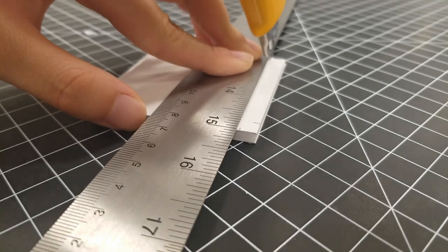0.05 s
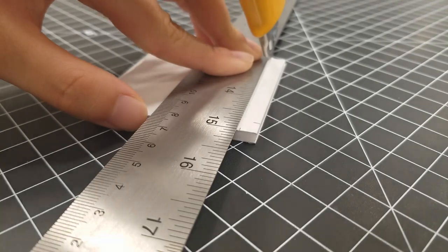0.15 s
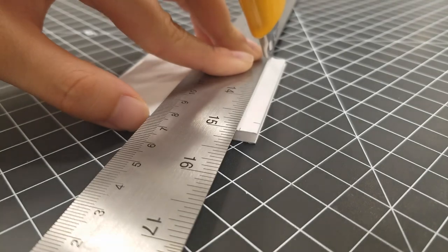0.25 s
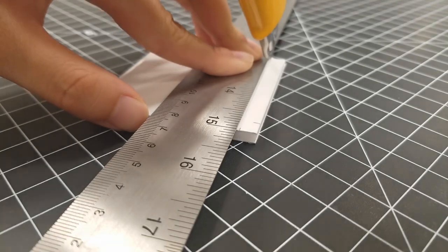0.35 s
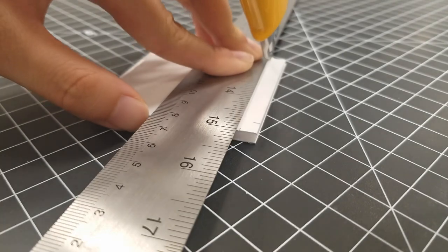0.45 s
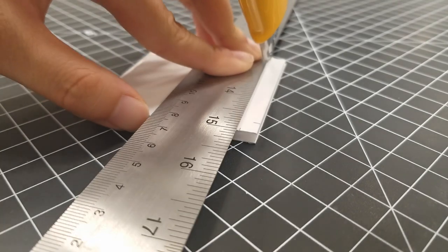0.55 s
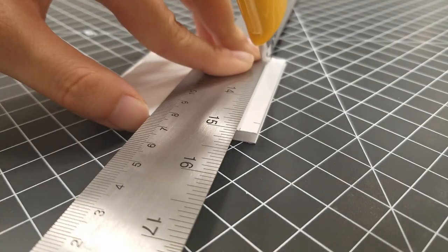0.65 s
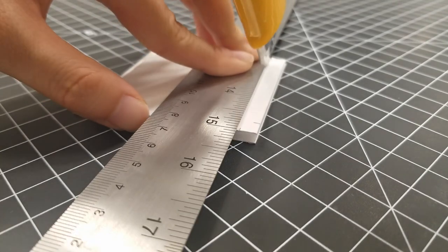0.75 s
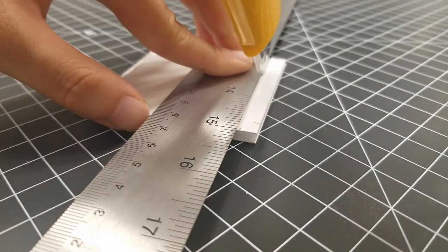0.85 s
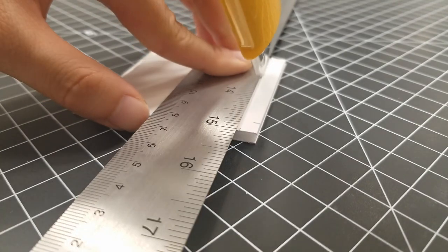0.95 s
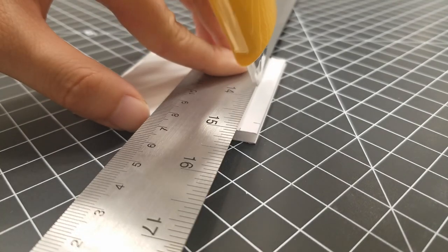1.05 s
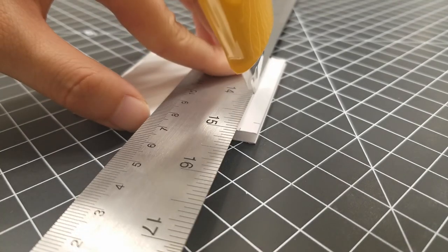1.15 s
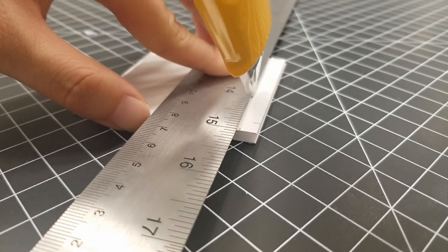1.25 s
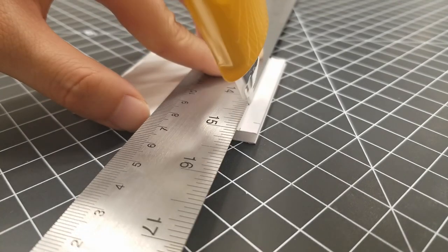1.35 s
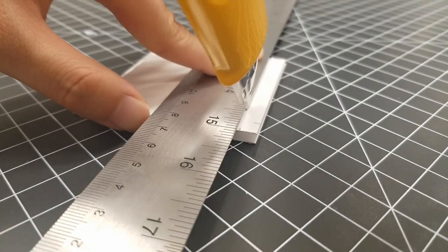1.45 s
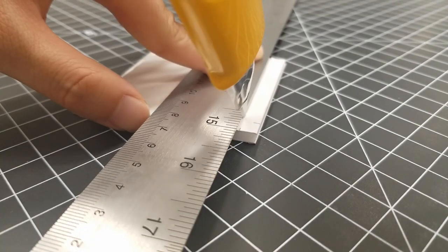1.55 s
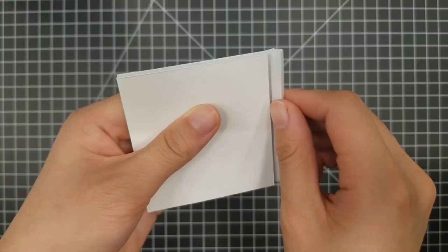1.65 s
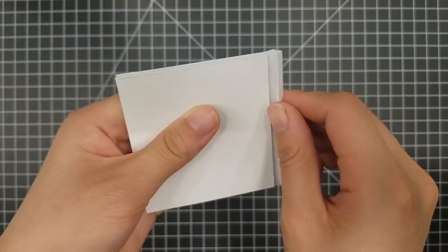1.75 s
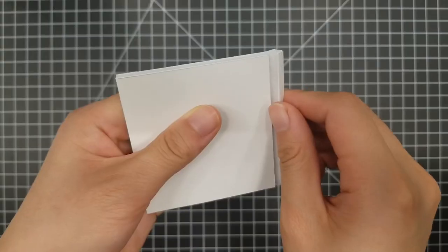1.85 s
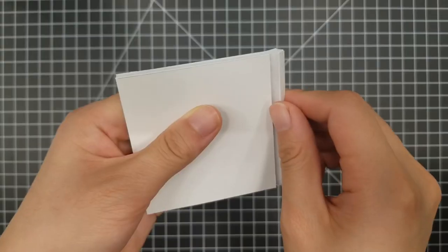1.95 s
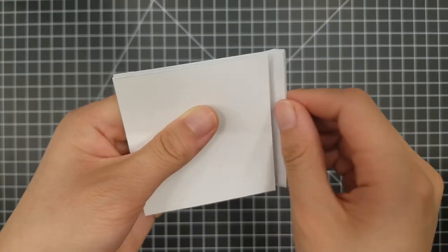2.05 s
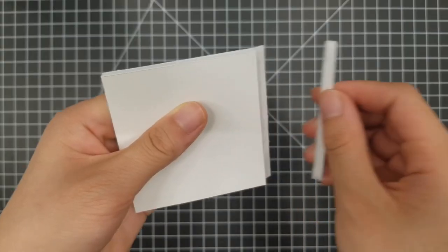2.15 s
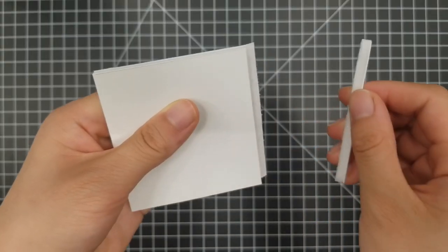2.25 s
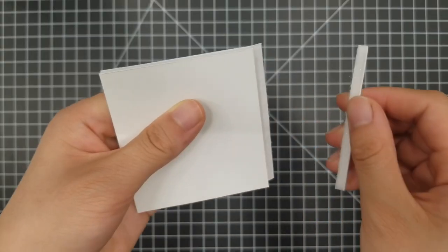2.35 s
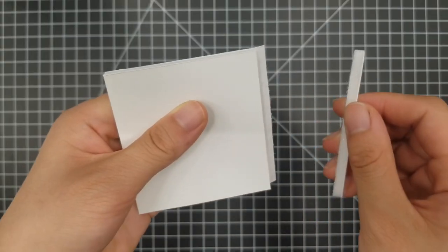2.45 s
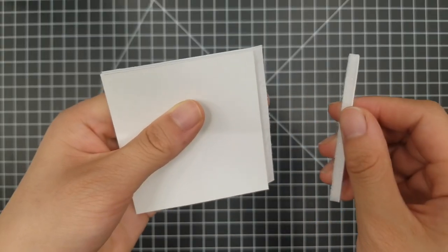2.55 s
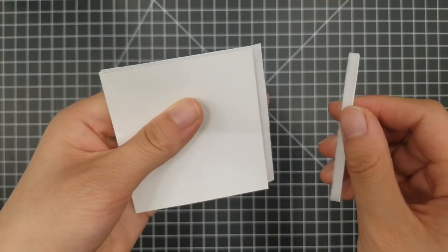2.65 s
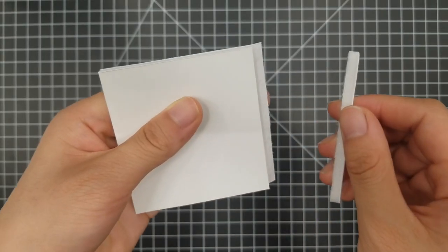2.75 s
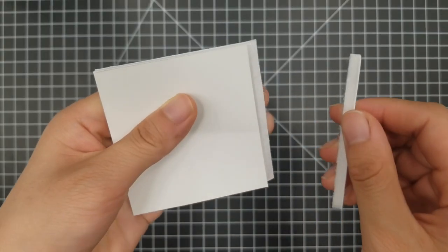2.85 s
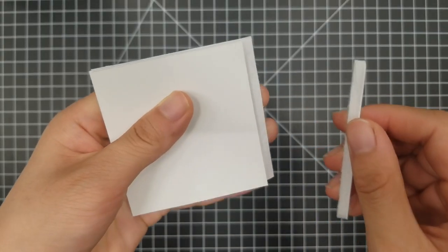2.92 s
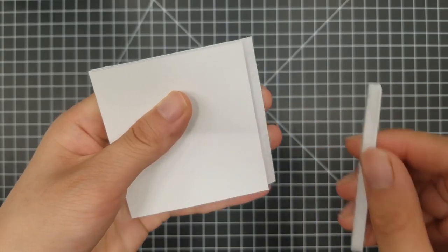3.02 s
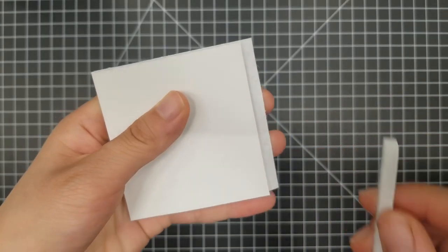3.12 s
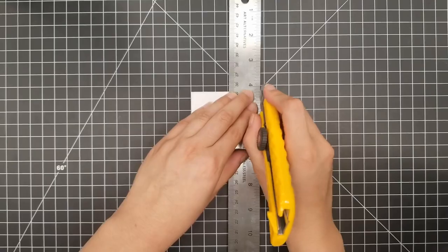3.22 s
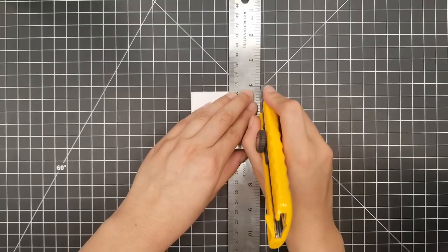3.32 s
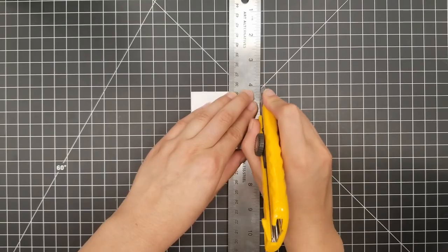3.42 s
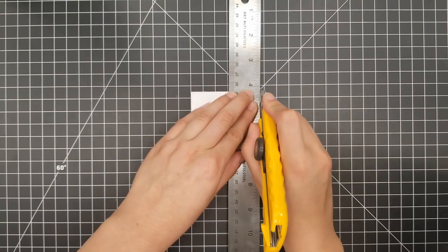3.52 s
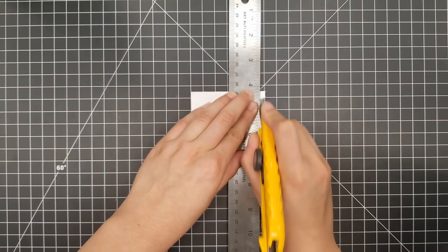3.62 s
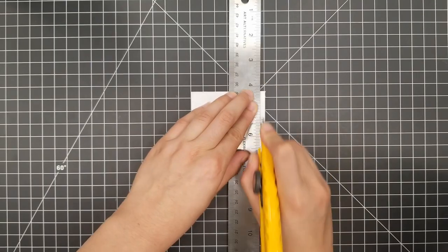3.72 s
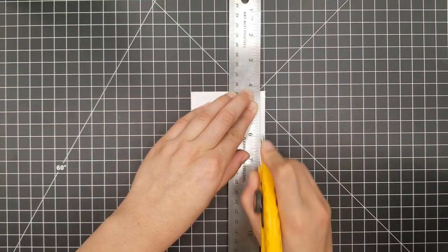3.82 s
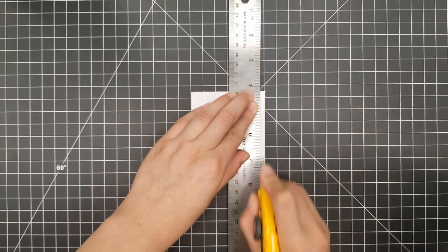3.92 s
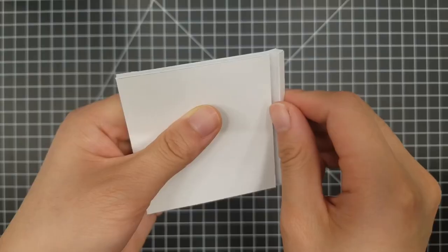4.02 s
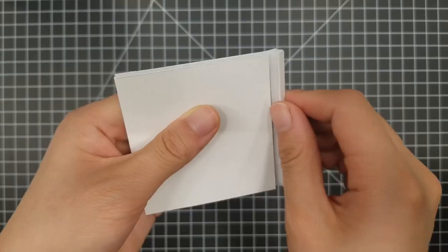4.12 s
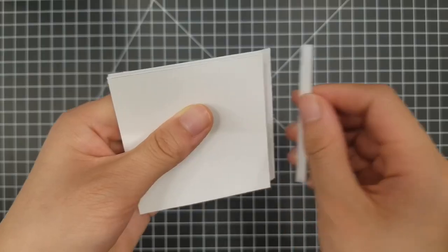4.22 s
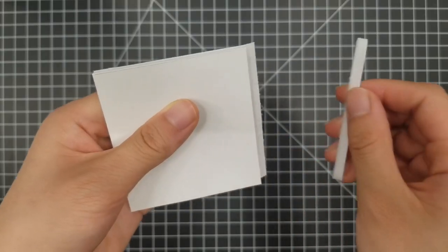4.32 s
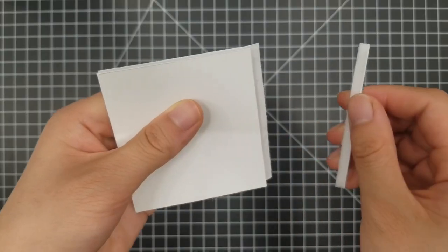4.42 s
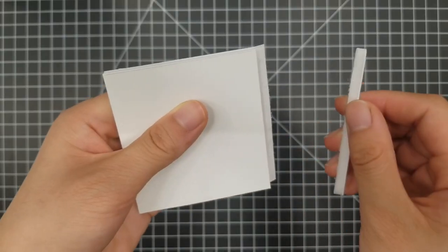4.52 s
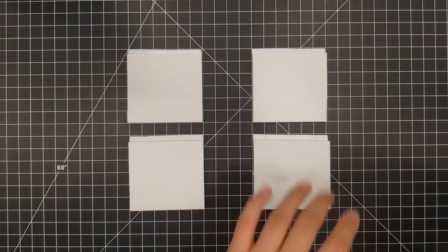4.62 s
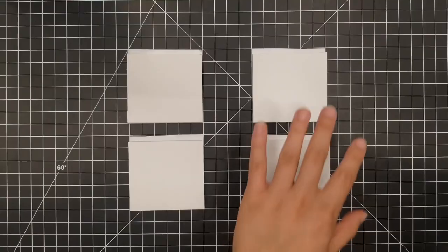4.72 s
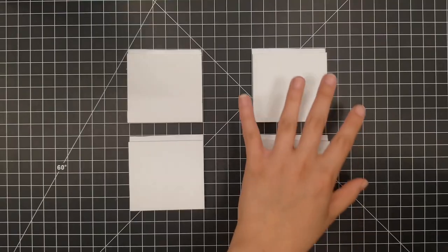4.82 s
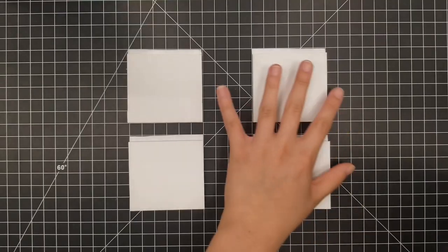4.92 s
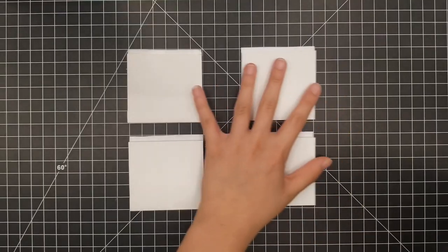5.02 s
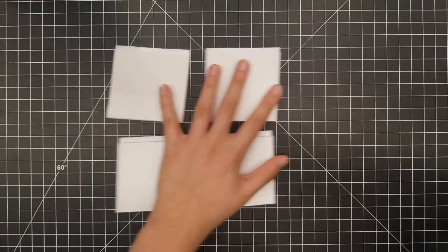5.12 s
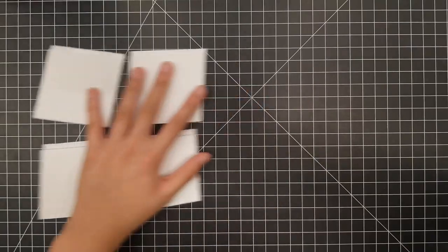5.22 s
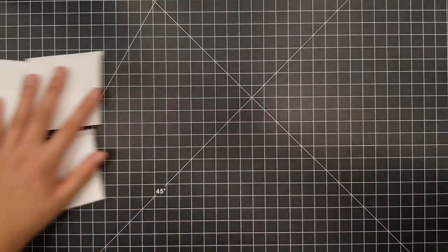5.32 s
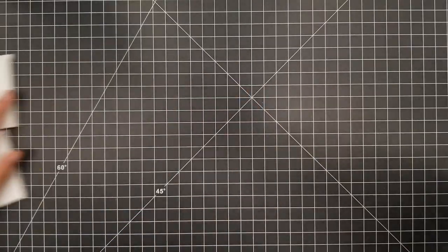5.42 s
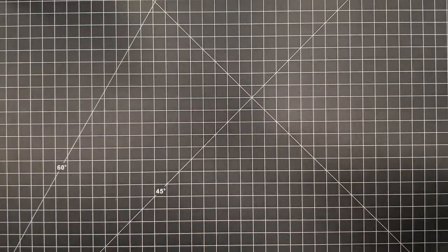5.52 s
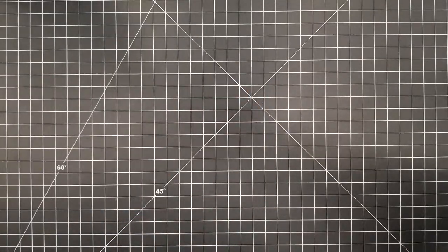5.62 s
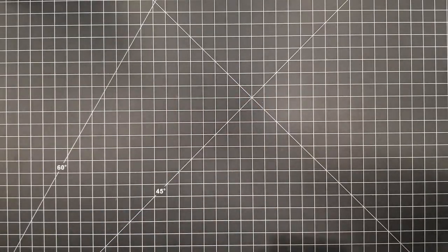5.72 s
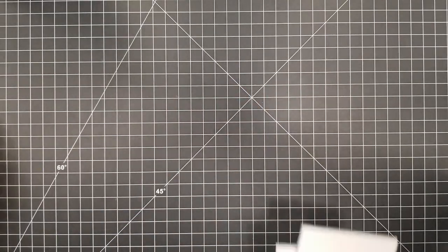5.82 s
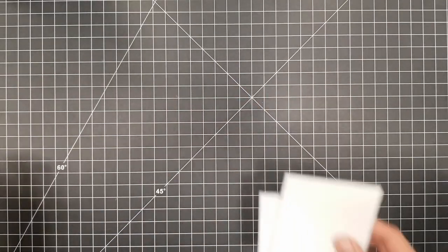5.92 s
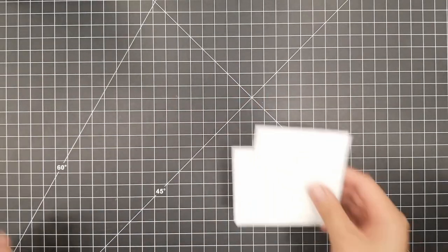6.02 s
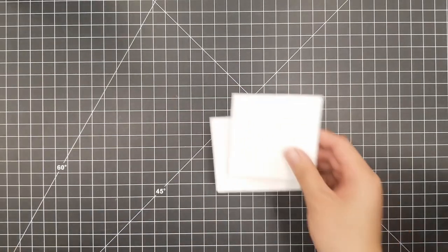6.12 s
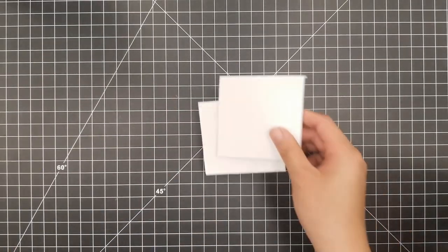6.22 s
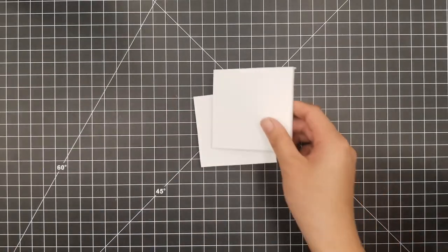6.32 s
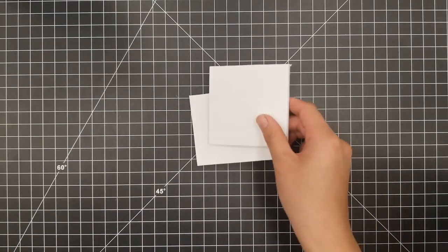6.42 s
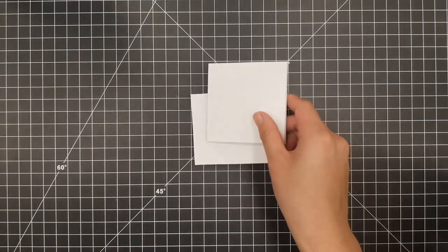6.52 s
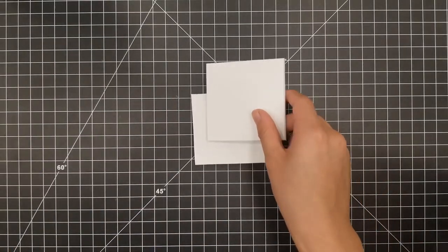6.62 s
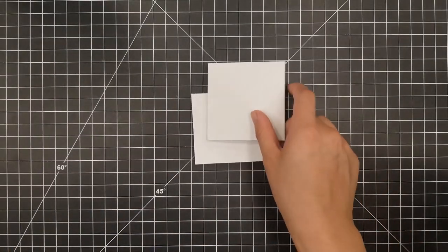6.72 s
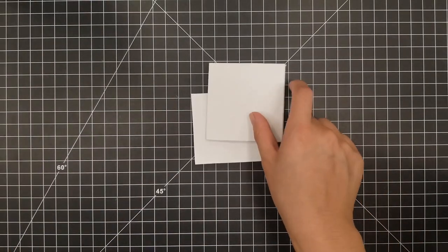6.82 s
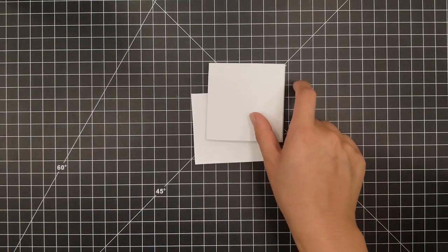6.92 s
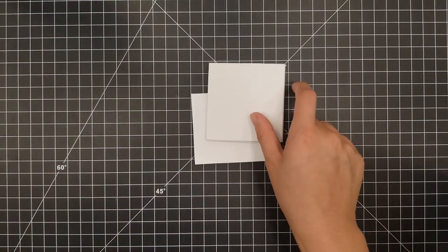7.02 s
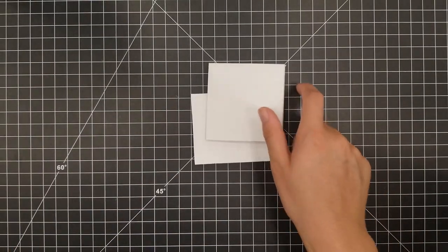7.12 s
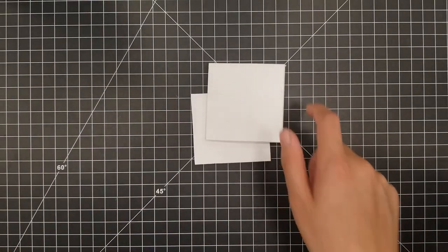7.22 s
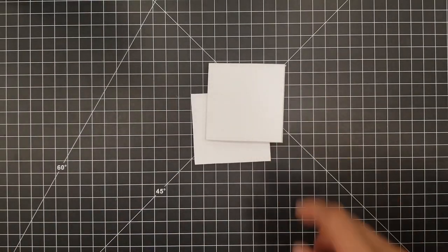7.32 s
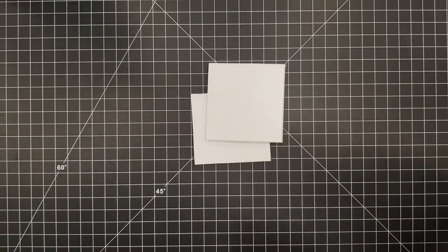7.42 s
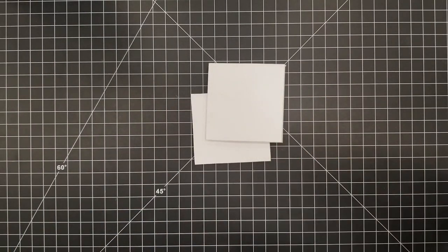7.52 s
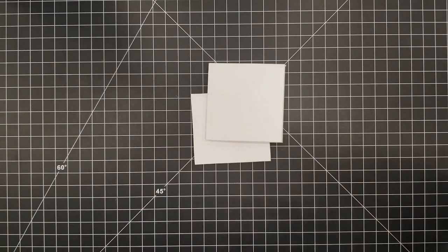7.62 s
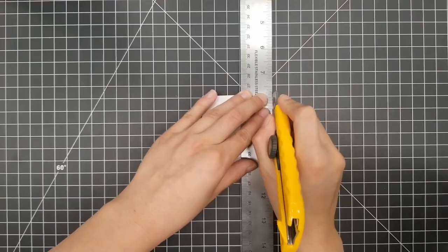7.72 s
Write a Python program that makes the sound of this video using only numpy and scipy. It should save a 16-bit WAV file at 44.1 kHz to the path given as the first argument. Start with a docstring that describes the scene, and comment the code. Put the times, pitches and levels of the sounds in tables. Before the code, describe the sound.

Close to the microphone, a craft knife crunches through foam board in short, gritty pushes with thin squeals and clicks, ending in a sharp crack and a table thud. A strip snaps off. A second, more distant cut and another snap follow. Then the squares hiss across a cutting mat, knock together and are laid down with a light tap. The small room hums quietly.

```python
"""At a table in a quiet, humming room, a craft knife cuts foam board along a steel ruler on a cutting mat. The
cut strip is snapped off, and the very same snap sounds again. Then the squares are swept across the mat and
knock together, and two are laid down again. Bursting foam cells and rubbing paper make dense tiny clicks, the
blade squeals as it sticks and slips, and the table thuds. A phone close by hears it with two microphones."""
import sys
import numpy as np
from scipy import signal
from scipy.fft import rfft, irfft
from scipy.io import wavfile
from scipy.ndimage import map_coordinates

SR = 44100
rng = np.random.default_rng(int(sys.argv[2]) if len(sys.argv) > 2 else 0)


def wrap_up_sound(samples):
    """Save the sound to the file named by the first command line argument, as 16-bit audio."""
    columns = np.atleast_2d(samples).T
    # keep every value between -1 and 1, then stretch to whole-number steps
    tamed = np.clip(columns, -1, 1)
    steps = np.round(tamed * 32767).astype(np.int16)
    wavfile.write(sys.argv[1], SR, steps)


N = 342216
TIME = np.arange(N) / SR
TOP_HZ = 15850  # the phone cuts off higher sound
CLOSE_CUT_END_S = 1.69

# tone of tearing paper, and of sliding on the mat: f/Hz, level/dB
TEAR_TONE = [(950, -25), (1350, -14), (1750, -20), (3200, -11), (3900, -20), (5200, -12), (10500, -6),
             (11900, 6), (15500, 1)]
MAT_TONE = [(1050, -27.5), (1650, -6), (2500, -1), (7500, 2), (15500, -.5)]
# resonances of the board (pitches it rings at; a negative gain is a dip): f/Hz, width/Hz, gain/dB
BOARD_RINGS = [(1640, 260, 7), (2870, 330, 9), (3960, 1900, -6)]
# how much louder the left side is, for sounds by the phone and farther along the desk: f/Hz, lead/dB
NEAR_SIDE = [(150, -12), (400, 8), (1300, 7.5), (2600, 26), (10000, 10.5)]
DESK_SIDE = [(700, 8.5), (4000, 11), (9000, 7.5)]


def amp(db):
    """Turn decibels into a gain."""
    return 10 ** (np.asarray(db) / 20)


def shape(tone, f):
    """Read a table of (f/Hz, level/dB) at frequencies f."""
    hz, db = np.transpose(tone)
    return np.interp(np.log(f + 1), np.log(hz), db)


def bumps(rings, f):
    """Gain in dB of bell-shaped resonances at frequencies f."""
    return sum(db / (1 + (2 * (f - hz) / width) ** 2) for hz, width, db in rings)


def freqs(x):
    """Frequencies in the spectrum of x."""
    return np.fft.rfftfreq(x.shape[-1], 1 / SR)


def colour(x, db):
    """Filter x with a dB value for each frequency."""
    return irfft(rfft(x) * amp(db), x.shape[-1])


def to_mics(x, side, lag_s=0):
    """Share a sound between two microphones: the left faces the hands, the right hears it lag_s later."""
    f = freqs(x)
    lead_db = shape(side, f)
    delay = np.exp(-2j * np.pi * f * lag_s * np.array([[0], [1]]))
    balance_db = 10 * np.log10((1 + amp(2 * lead_db)) / 4)
    return irfft(rfft(x) * delay * amp(np.array([lead_db, 0 * lead_db]) - balance_db), N)


def noise_pair(n, alike):
    """Left and right noise, from unrelated (alike=0) to the same (alike=1)."""
    noise = rng.standard_normal((3, n))
    return np.sqrt(alike) * noise[0] + np.sqrt(1 - alike) * noise[1:]


def wobble(t, per_s):
    """A random line that turns per_s times a second."""
    turns = np.arange(0, N / SR + 1, 1 / per_s)
    return np.interp(t, turns, rng.standard_normal(len(turns)))


def add(out, s, x):
    """Mix x in at s seconds."""
    i = max(int(s * SR), 0)
    out[:, i:i + x.shape[1]] += x[:, :max(N - i, 0)]


def stroke(s, hold, db, rise, fall):
    """Force of one hand movement: it builds up to time s, holds, then lets go."""
    return amp(db) * np.interp(TIME, [s - rise, s, s + hold, s + hold + fall], [0, 1, 1, 0]) ** 2


def strokes(rows, **edges):
    """Force of several movements together, which may share a rise and a fall in seconds."""
    return np.sqrt(sum(stroke(*row, **edges) ** 2 for row in rows))


def friction(force, tone, rings=(), glide=((0, 1),), rough=1.2, patchy_db=1.9, wander=.008,
             change_per_s=8, scatter=.7):
    """Rubbing: countless tiny, uneven slips ring resonances that shift as the contact moves."""
    first_s, last_s = np.flatnonzero(force)[[0, -1]] // SR
    t = TIME[first_s * SR:(last_s + 1) * SR]
    slips = noise_pair(len(t), .5)
    slips *= amp(rough * (2 * wobble(t, 5000) + wobble(t, 400) + .5 * wobble(t, 90)))
    f, elapsed, spectrum = signal.stft(slips / slips.std(), SR, nperseg=640)
    when = elapsed + t[0]
    f, elapsed = np.meshgrid(f, elapsed, indexing="ij")
    # many weak resonances come and go, each reaching the two microphones with its own phase
    spot = [f / 240, elapsed * change_per_s]
    patches, phase = (map_coordinates(m, spot, mode="nearest") for m in rng.standard_normal((2, 96, 128)))
    spectrum = spectrum * np.exp(1j * scatter * np.array([phase, -phase]))
    gain_db = shape(tone, f) + patchy_db * patches
    pitch_ratio = np.interp(when, *np.transpose(glide))
    for ring in rings:
        gain_db += bumps([ring], f / pitch_ratio / np.exp(wander * wobble(when, 11)))
    gain = amp(gain_db)
    gain /= np.sqrt(np.mean(gain ** 2 * (f < TOP_HZ), axis=0))  # the force sets the loudness
    out = np.zeros((2, N))
    add(out, t[0], signal.istft(spectrum * gain, SR)[1][:, :len(t)])
    return out * force


def burst(db, ring_s, tone):
    """A crack of noise that dies by 60 dB in ring_s; tone(f) gives its dB at each frequency."""
    t = np.arange(4096) / SR
    x = noise_pair(len(t), .21) * amp(-60 * t / ring_s) * (1 - np.exp(-t / .0006))
    fade = np.minimum(2 * (1 - t / t[-1]), 1) ** 2
    x = colour(x, tone(freqs(x))) * fade
    return x * amp(db) / np.sqrt(np.mean(np.max(x ** 2, axis=1)))


def strikes(rows, rings, slope_db):
    """Blows ring an object; each is slope_db weaker per octave away from its own frequency."""
    out = np.zeros((2, N))
    for s, db, hz, ring_s in rows:
        add(out, s, burst(db, ring_s, lambda f: bumps(rings, f) - slope_db * abs(np.log2((f + 1) / hz))))
    return out


def close_cut():
    """By the phone the blade bursts foam cells push by push, then breaks out of the board's edge."""
    # tone of the bursting foam: f/Hz, level/dB
    foam = [(380, -7), (530, -11.5), (1050, -7.5), (1500, -14.5), (2050, -8), (4400, -3), (6500, -1),
            (11000, -2), (15500, 2.5)]
    # resonances of the blade and dips between them: f/Hz, width/Hz, gain/dB
    blade = [(2620, 250, 10.5), (3100, 240, -8), (3480, 220, 6), (4520, 280, 10), (5100, 350, -5),
             (6300, 350, 4), (7600, 600, 4), (9400, 1200, -6)]
    # they sag as the blade sinks in: t/s, pitch ratio
    sag = [(.6, 1.03), (1.0, .995)]
    # a light drag all through the cut: t/s, hold/s, level/dB, rise/s, fall/s
    drag = (0.62, 1.04, -52.5, .36, .02)
    # pushes of the knife: t/s, hold/s, level/dB
    pushes = [(0.48, .015, -50), (0.565, .06, -48.5), (0.705, .065, -41.5), (0.955, .16, -46.5),
              (1.23, .05, -47.5), (1.34, .12, -50.5), (1.495, .055, -37.5), (1.605, .045, -42)]
    # the blade breaks out: t/s, level/dB, f/Hz, ring/s
    breakout = [(1.650, -23, 8000, .04), (1.6552, -16, 6500, .014), (1.6605, -14, 5400, .013),
                (1.667, -25, 4500, 0.028)]
    force = np.hypot(stroke(*drag), strokes(pushes, rise=.055, fall=.07))
    x = friction(force, foam, blade, sag, patchy_db=2.5) + squeals(0, CLOSE_CUT_END_S)
    return to_mics(x + strikes(breakout, blade[1:], slope_db=5.5), NEAR_SIDE)


def far_cuts():
    """Farther off the blade bites, squeals, snags in the paper skin and scrapes the mat with its tip."""
    # tone of the bursting foam: f/Hz, level/dB
    foam = [(750, -14), (1100, -19), (1600, -10), (4200, -5), (6500, -1), (15500, 6)]
    # resonances of the blade and a dip: f/Hz, width/Hz, gain/dB
    blade = [(1950, 200, 8), (2720, 280, 18), (3120, 280, -18), (4650, 250, 9)]
    # they climb as the blade nears the edge: t/s, pitch ratio
    climb = [(3.35, .96), (3.9, 1.04)]
    # movements of the knife: t/s, hold/s, level/dB, rise/s, fall/s
    pulls = [(3.316, .06, -61, .03, .3), (3.6, .352, -47.5, .24, .015), (7.73, .03, -66, .03, .03)]
    snag = (3.653, .012, -40, .005, .04)
    tip_scrape = (3.84, .11, -48.5, .09, .018)
    x = friction(strokes(pulls), foam, blade, climb, scatter=.35) + squeals(CLOSE_CUT_END_S, N / SR)
    x += friction(stroke(*snag), TEAR_TONE) + friction(stroke(*tip_scrape), MAT_TONE)
    return to_mics(x, DESK_SIDE)


def squeals(since, until):
    """The blade sticks and slips in the foam and sings; its pitch depends on how deep it sits."""
    # squeals: t/s, hold/s, level/dB, f/Hz
    notes = [(.385, .06, -64, 4420), (.76, .14, -58, 4340), (.98, .14, -55, 4480), (1.23, .055, -52, 4370),
             (1.51, .1, -49, 7520), (3.575, .05, -56, 4640), (7.725, .035, -69, 4620)]
    width_hz = 310
    out, f = np.zeros((2, N)), freqs(TIME)
    for s, hold, db, hz in notes:
        if since <= s < until:
            ring = colour(noise_pair(N, .8), -20 * np.log10(1 + (2 * (f - hz) / width_hz) ** 2))
            out += ring / ring.std() * stroke(s, hold, db, rise=.04, fall=.04)
    return out


def snaps():
    """A strip is bent off and its paper skin tears in quick cracks; the same snap sounds twice."""
    # the paper tears: t/s, hold/s, level/dB, rise/s, fall/s
    tear = (2.0105, .036, -37.3, .014, .014)
    # the board creaks, then springs back: t/s, level/dB, f/Hz, ring/s
    flexes = [(1.984, -48, 7000, .05), (2.047, -35, 5000, .016)]
    # the last fibres part: t/s, level/dB, ring/s
    cracks = [(2.0125, -27, .010), (2.0188, -20.5, 0.014), (2.0285, -20, .009), (2.0345, -25, .009)]
    snap = friction(stroke(*tear), TEAR_TONE) + strikes(flexes, BOARD_RINGS, slope_db=5.5)
    for s, db, ring_s in cracks:
        add(snap, s, burst(db, ring_s, lambda f: shape(TEAR_TONE, f)))
    out = snap.copy()
    add(out, 2.0995, snap)  # seconds from one snap to the next
    return to_mics(out, side=[(700, 10), (4400, 16), (8500, 7.2), (13000, 9.2)])


def sliding_squares():
    """Paper faces hiss and judder over the mat as the hand pushes the squares along."""
    # movements of the hand: t/s, hold/s, level/dB, rise/s, fall/s
    brush = (4.948, .14, -54.5, .026, .05)
    sweep = (5.135, .228, -38.5, .17, .21)
    shove = (5.485, .05, -42, .09, .15)
    slide = (5.62, .25, -71.5, .05, .6)
    # the squares judder: t/s, hold/s, level/dB
    judders = [(5.44, .09, -53), (5.545, .045, -43)]
    # tones of shove and judder: f/Hz, level/dB
    shove_tone = [(150, -30), (800, -7), (2800, 0.5), (4500, -4.5), (15500, -8.5)]
    hollow_tone = [(90, -14), (190, 0), (320, 4), (520, -14), (820, -7), (1500, -35)]
    # the weak range of a light brush, and the resonance under the board: f/Hz, width/Hz, gain/dB
    brush_dip = [(1900, 1600, -7)]
    air_gap = [(1880, 340, 10.5)]
    # that resonance climbs as the hand moves on: t/s, pitch ratio
    climb = [(5.25, 1.0), (5.31, 1.66)]
    x = friction(stroke(*brush), MAT_TONE, brush_dip)
    x += friction(stroke(*sweep), MAT_TONE, air_gap, climb,
                  rough=.5, patchy_db=1.5, wander=.025, change_per_s=25)
    x += friction(stroke(*shove), shove_tone, BOARD_RINGS, change_per_s=25)
    x += friction(stroke(*slide), MAT_TONE, air_gap)
    return x + friction(strokes(judders, rise=.02, fall=.075), hollow_tone)


def handled_squares():
    """Squares rub on fingers and each other and knock; the top one slips off the thumb and taps down."""
    # fingers rub, square scrapes on square, the top one settles: t/s, hold/s, level/dB
    rubs = [(2.785, .04, -68), (3.02, .015, -70), (5.99, .015, -62.5), (6.12, .21, -71), (6.385, .08, -66),
            (6.535, .14, -66)]
    scrapes = [(6.385, .12, -68), (6.547, .08, -60.5), (6.647, .03, -48.5)]
    settles = [(6.73, .03, -64), (6.81, .015, -61)]
    # tones of those three: f/Hz, level/dB
    skin_tone = [(900, -8.5), (2200, 1.5), (4000, -11.5), (8000, -4), (10300, 6), (13500, -3)]
    paper_tone = [(1150, -18), (1550, -2), (2250, 0), (3800, -7), (8200, -13), (10000, -5), (15000, -11)]
    settle_tone = [(2800, 0), (7000, -12)]
    # resonances of the stack and of the top square: f/Hz, width/Hz, gain/dB
    stack_rings = [(1570, 170, 12), (2290, 240, 14)]
    top_rings = [(2570, 380, 14), (3210, 330, 12), (4300, 300, 9), (5000, 500, 13), (9900, 1700, 19)]
    # edges knock and the top square lands: t/s, level/dB, f/Hz, ring/s
    knocks = [(3.915, -44, 1250, 0.028), (5.361, -30, 2380, 0.014), (5.437, -31, 2920, 0.028),
              (5.446, -23.5, 1600, .018), (5.565, -33, 1390, 0.016), (6.301, -50.5, 2000, 0.02),
              (6.3095, -50, 1700, .02), (6.68, -43, 2300, .014)]
    tap = (6.7892, -27, 3200, .018)
    x = friction(strokes(rubs, rise=.03, fall=.12), skin_tone)
    x += friction(strokes(scrapes, rise=.04, fall=.045), paper_tone, stack_rings, rough=2.3)
    x += friction(strokes(settles, rise=.04, fall=.045), settle_tone, top_rings)
    return x + strikes(knocks, BOARD_RINGS, slope_db=8.5) + strikes([tap], top_rings, slope_db=3.5)


def clicks():
    """Blade, foam and fingernails catch with short, bright clicks."""
    # clicks: t/s, level/dB
    catches = [(0.2743, -54), (0.8865, -28), (0.925, -36), (1.4885, -22.5), (2.499, -52), (2.759, -50.5),
               (3.652, -31), (3.925, -33), (3.951, -36), (4.6005, -55), (6.599, -36.5)]
    return to_mics(strikes([(s, db, 12000, .011) for s, db in catches], (), slope_db=15), DESK_SIDE)


def table_thuds():
    """The table top thuds under blade and hand; a longer contact leaves only its low notes."""
    # blows: t/s, peak/dB, contact/s, left minus right/dB
    blows = [(1.671, -21, 0.0012, 8), (7.446, -41.5, .012, 13.5), (7.463, -41, 0.0085, 9.5)]
    # notes of the table top: f/Hz, level/dB, ring/s
    notes = [(78, 1, .055), (150, -3, .045), (259.8, 8, 0.031), (370, -0.5, 0.028)]
    out, t = np.zeros((2, N)), np.arange(SR // 4) / SR
    ring = sum(amp(db - 60 * t / ring_s) * np.cos(2 * np.pi * hz * t) for hz, db, ring_s in notes)
    for s, db, contact_s, lead_db in blows:
        push = t * np.exp(-2 * np.pi * t / contact_s)
        thud = signal.fftconvolve(ring, push)[:len(t)]
        sides = amp([[lead_db], [0]])
        add(out, s, -thud / np.abs(thud).max() * amp(db) * sides / sides.mean())
    return out


def echo(x, ring_s, level_db):
    """The small room answers with a short, blurred tail."""
    # tone of the tail: f/Hz, gain/dB
    tone = [(6000, 1.2), (12000, -6.5)]
    t = np.arange(SR // 2) / SR
    tail = noise_pair(len(t), 0) * amp(-60 * t / ring_s) * (t > .004)
    tail *= amp(level_db) / np.sqrt(np.sum(tail[0] ** 2))
    tail = colour(tail, shape(tone, freqs(tail)))
    return signal.fftconvolve(x.mean(axis=0)[None], tail, axes=1)[:, :N]


def air(tone, db, side, bass_hz):
    """Steady room noise, alike at both microphones in the bass."""
    f = freqs(TIME)
    bass_share = 1 / (1 + (f / bass_hz) ** 4)
    shared = colour(noise_pair(N, .92), shape(tone, f) + 10 * np.log10(bass_share))
    separate = colour(noise_pair(N, 0), shape(tone, f) + 10 * np.log10(1 - .9 * bass_share))
    x = to_mics(shared + separate, side)
    return x * amp(db) / x.mean(axis=0).std()


def background():
    """A hush during the close cut, then a fan-like rumble with a wavering hum."""
    # tones of hush and rumble, and the notes of the hum: f/Hz, level/dB
    hush_tone = [(25, -20), (115, 3), (200, -8.5), (650, -8.5), (850, -21.5), (6000, -40.5), (15000, -21.5)]
    rumble_tone = [(25, -19.5), (48, -9), (130, -8), (270, -16), (480, -30.5), (1000, -39), (4500, -49),
                   (9300, -52), (13000, -39.5)]
    hum_notes = [(119, -62.5), (174, -65.5), (236, -68)]
    # how much louder the room is on the left: f/Hz, lead/dB
    side = [(330, 14.5), (700, 3.5)]
    hum = np.zeros((2, N))
    for hz, db in hum_notes:
        loudness = amp(db + 2.5 * wobble(TIME, 8.4))
        pitch_hz = hz + 2.5 * wobble(TIME, 12)
        hum += loudness * np.sin(2 * np.pi * np.cumsum(pitch_hz) / SR)
    room = air(rumble_tone, db=-60, side=side, bass_hz=450) + to_mics(hum, side)
    hush = air(hush_tone, db=-67.5, side=NEAR_SIDE[:2], bass_hz=200)
    fade_in = np.clip((TIME - CLOSE_CUT_END_S) / .03 + .5, 0, 1)
    return hush * (1 - fade_in) + room * fade_in


def dips():
    """The room's level dips briefly, four times."""
    # middle of each dip: t/s
    times = [3.188, 3.989, 4.655, 7.689]
    return np.prod([np.clip(np.abs(TIME - s) / .031, .08, 1) for s in times], axis=0)


def scene():
    """The close cut has no echo; the other work of the hands is heard with the room."""
    hands = far_cuts() + clicks() + snaps() + table_thuds()
    hands += to_mics(sliding_squares() + handled_squares(), DESK_SIDE, lag_s=.00027)
    return close_cut() + hands + (echo(hands, ring_s=.28, level_db=-15.5) + background()) * dips()


def record(dry):
    """Each microphone opening colours the treble in its own way, and the phone cuts off the top."""
    # dips and a resonance of the two openings: f/Hz, width/Hz, gain/dB
    left = [(8900, 1000, -6)]
    right = [(8000, 1500, -10), (10200, 1700, 5.5)]
    f = freqs(dry)
    coloured = colour(dry, np.array([bumps(left, f), bumps(right, f)]))
    return signal.sosfilt(signal.ellip(10, .2, 75, TOP_HZ, fs=SR, output="sos"), coloured)


dry = scene()
out = record(dry)
wrap_up_sound(out)
```